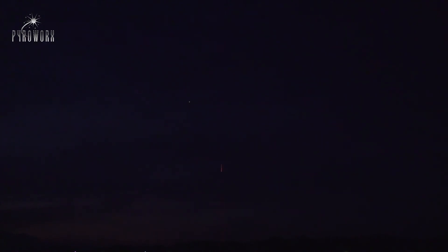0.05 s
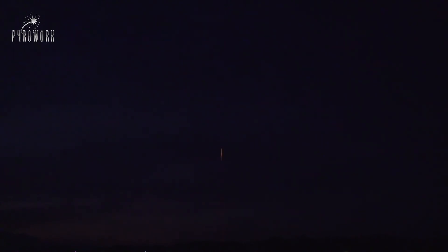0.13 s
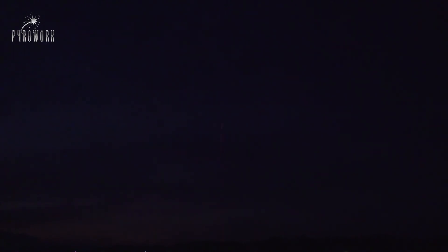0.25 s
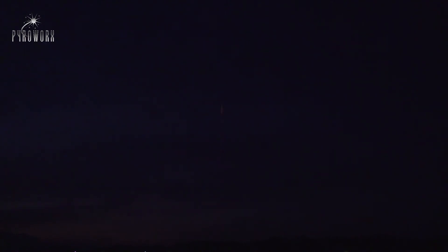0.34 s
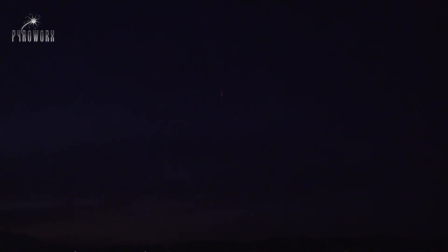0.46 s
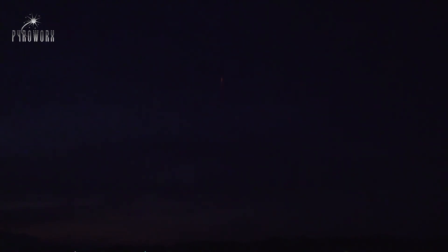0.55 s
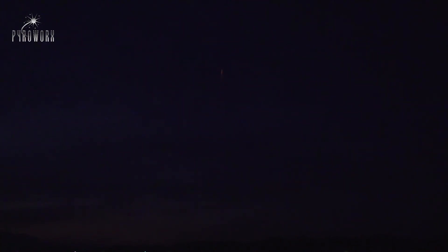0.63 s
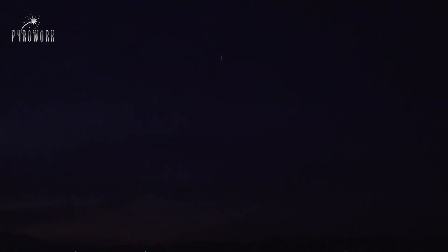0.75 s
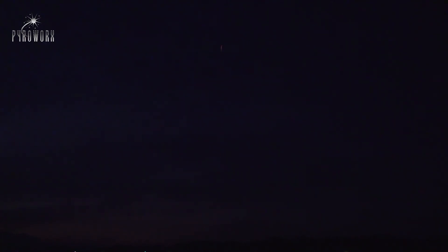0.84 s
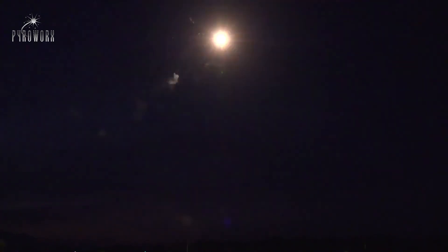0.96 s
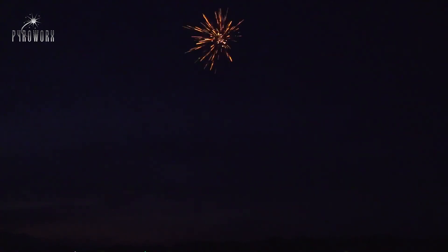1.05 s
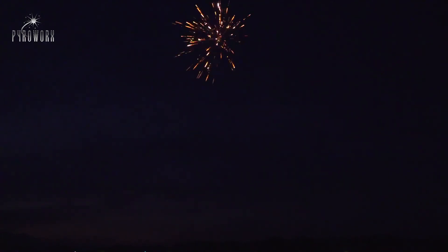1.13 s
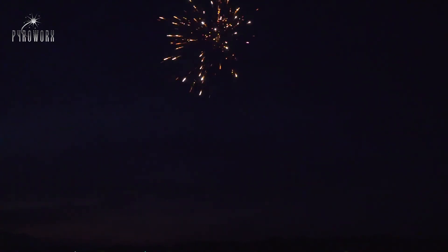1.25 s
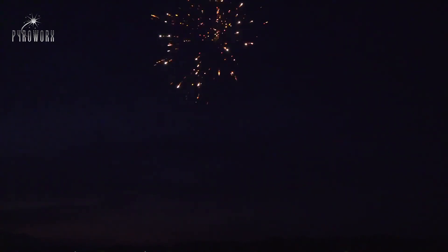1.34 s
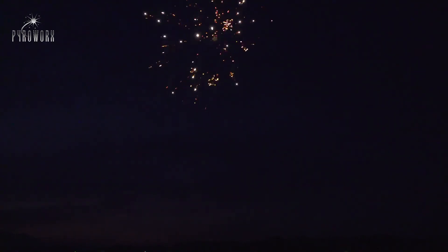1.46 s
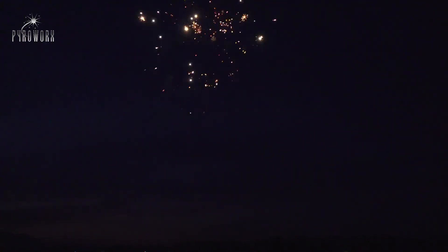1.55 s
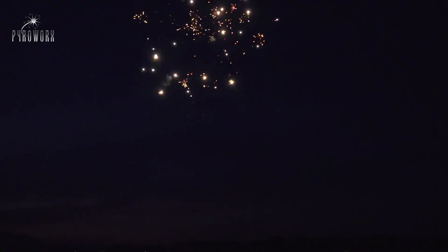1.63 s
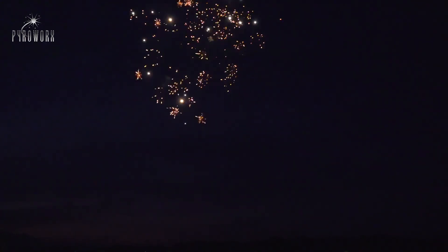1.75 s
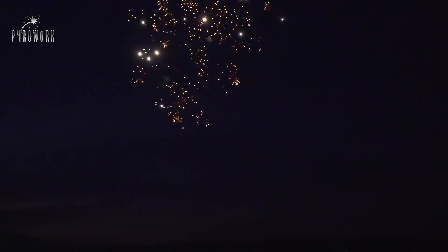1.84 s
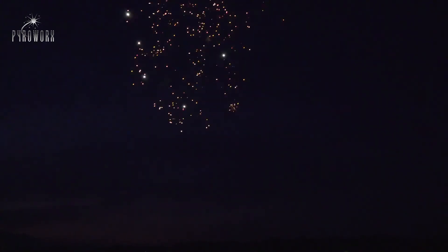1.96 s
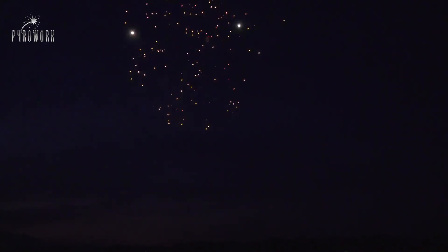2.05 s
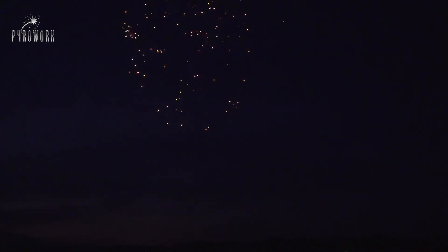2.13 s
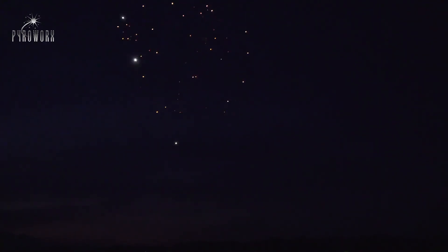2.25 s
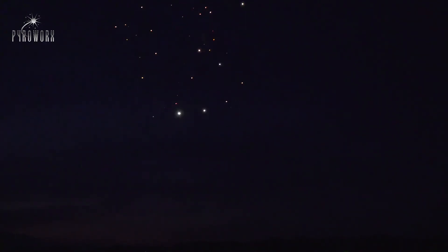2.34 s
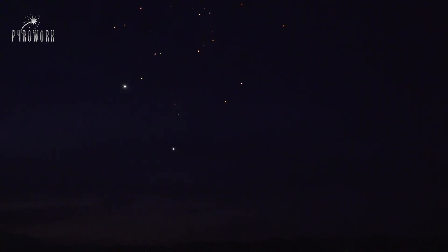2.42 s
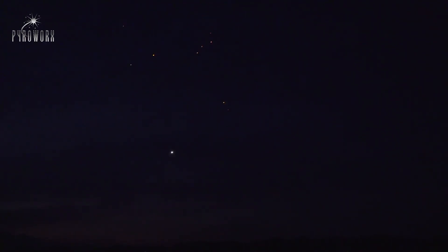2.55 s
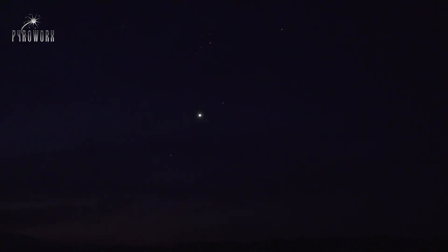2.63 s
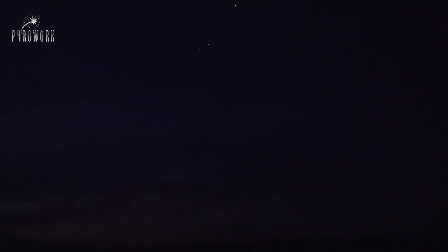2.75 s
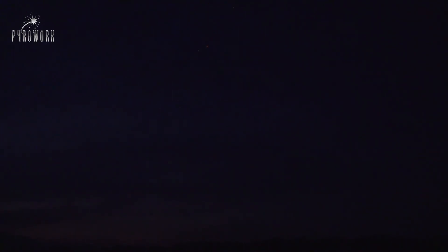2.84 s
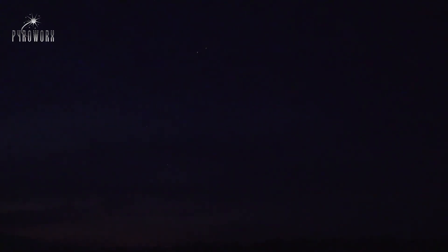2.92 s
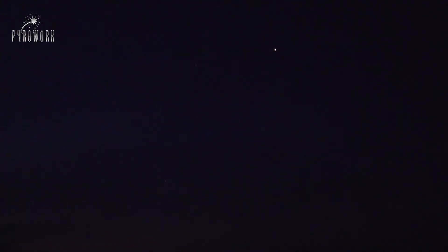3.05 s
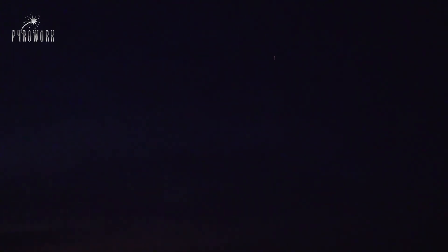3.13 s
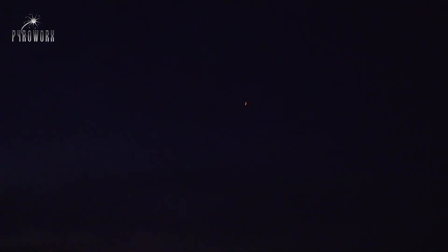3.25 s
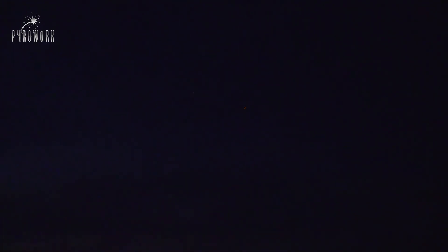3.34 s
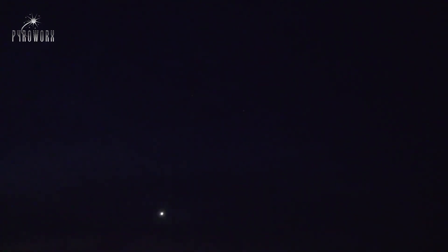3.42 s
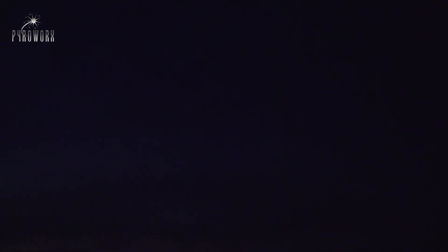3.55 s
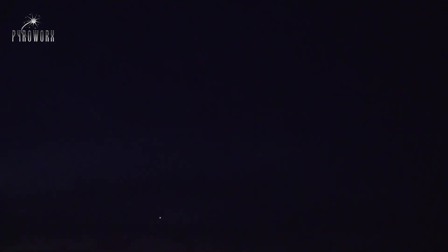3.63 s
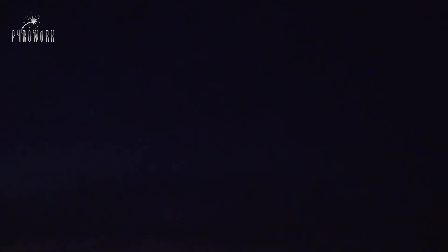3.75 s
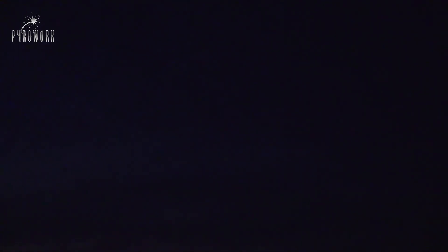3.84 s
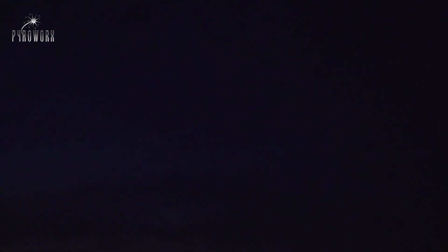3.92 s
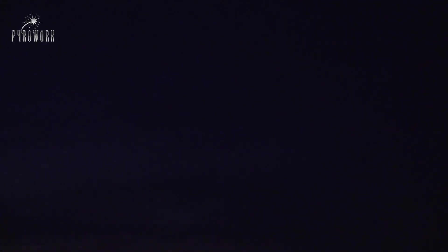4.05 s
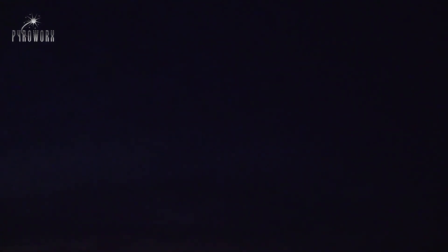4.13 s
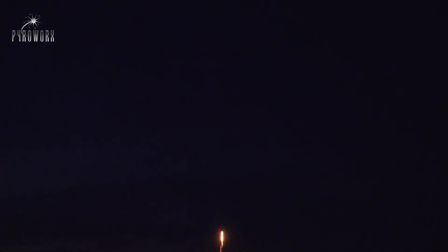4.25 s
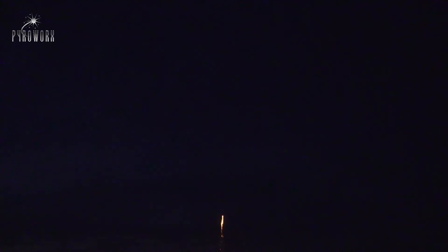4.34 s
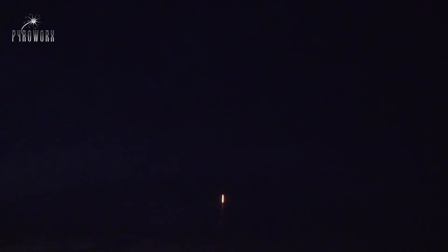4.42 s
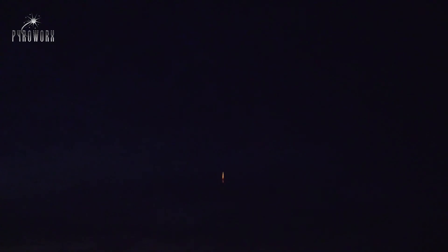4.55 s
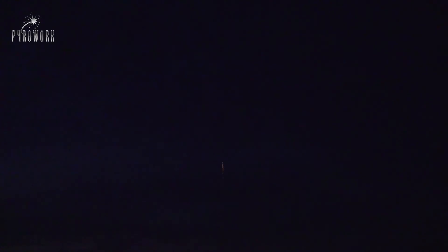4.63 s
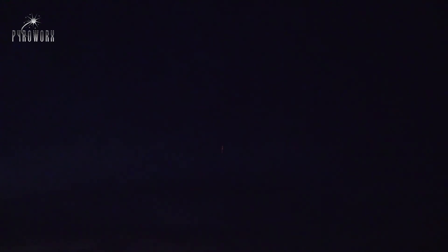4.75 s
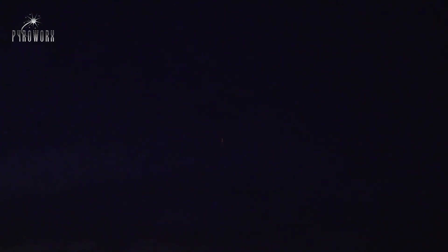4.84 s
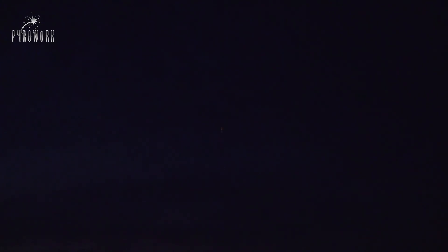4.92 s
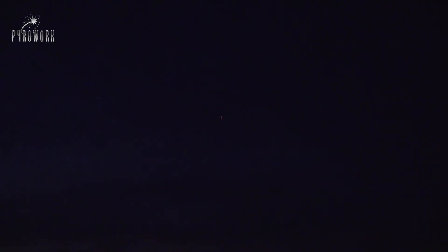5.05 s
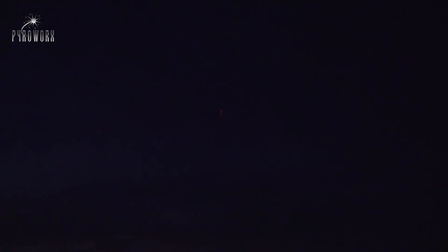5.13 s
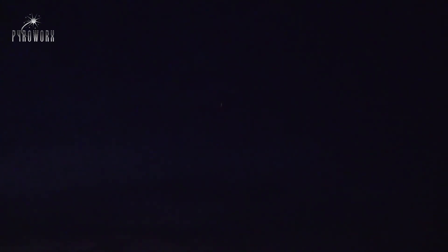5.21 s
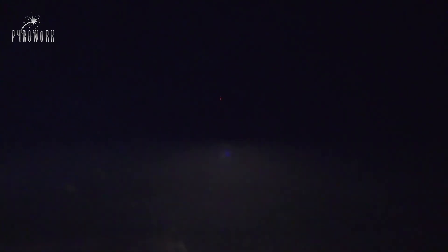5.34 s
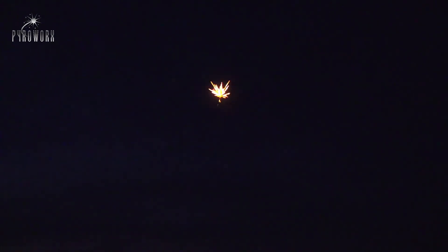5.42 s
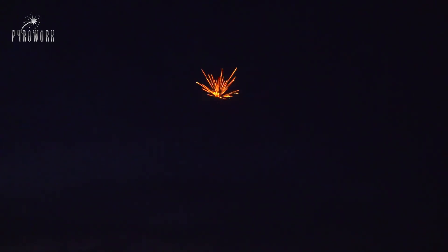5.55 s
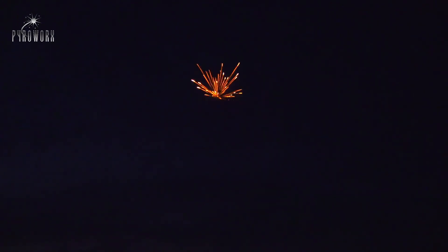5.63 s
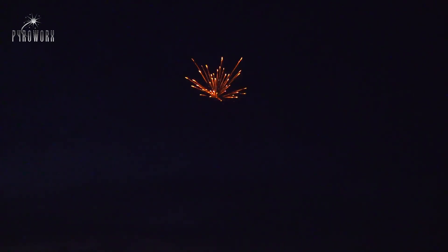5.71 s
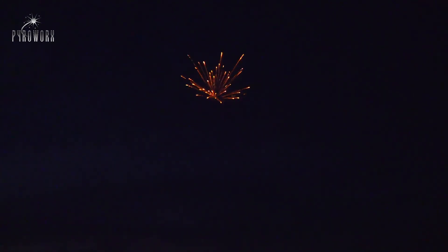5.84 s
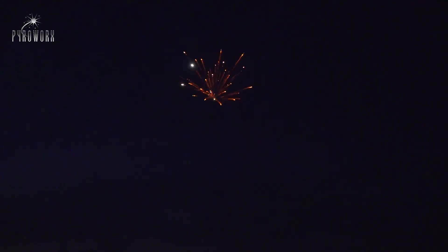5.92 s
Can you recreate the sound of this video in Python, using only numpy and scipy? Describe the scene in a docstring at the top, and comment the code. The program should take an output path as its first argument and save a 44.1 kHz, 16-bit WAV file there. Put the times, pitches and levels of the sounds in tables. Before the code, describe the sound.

Outdoors at night, a firework shot cracks from its tube, bursts overhead into sharp crackling sparks, then a second shot cracks and bangs, echoing far away.

```python
"""Outdoors at night a roman candle is fired: stars leave the tube with a crack and burst overhead as blast waves,
one into crackling sparks. The ground mirrors bursts and sparks; trees and far slopes return diffuse echoes.
A bush cricket chirps in pulses of gliding tone. Far hum, rumble and a breeze brushing the microphone are
shaped noise. The bursts overload the recorder, which is pushed off centre and saturates."""
import sys
import numpy as np
from scipy import signal
from scipy.fft import rfft, irfft, next_fast_len
from scipy.io import wavfile
from scipy.ndimage import uniform_filter1d

SR = 44100
rng = np.random.default_rng(int(sys.argv[2]) if len(sys.argv) > 2 else 0)


def to_wav(s):
    """Save 16-bit WAV."""
    ch = np.atleast_2d(s).T  # columns
    pcm = np.round(np.clip(ch, -1, 1) * 32767)  # PCM
    wavfile.write(sys.argv[1], SR, pcm.astype(np.int16))


N = 263707
LEAD = 2048  # samples computed ahead of time 0 and then cut off
TIME = np.arange(-LEAD, N) / SR

# Spectrum of a spark's snap. Each row: frequency in Hz, relative level in dB.
SNAP_SPECTRUM = [(50, -32), (120, -16.5), (300, -7), (700, -2), (1600, -1), (3200, -2.5), (6000, -8.5),
                 (10000, -19), (15000, -34)]
# Diffuse return of a sound overhead. One row: near ground in dB, its fade in dB per second,
# far country in dB, its fade in dB per second.
OVERHEAD_WASH = (3.5, 1099.5, -22, 4)
# Tree lines and slopes that stand out of it. Each row: delay in seconds, energy per second in dB,
# spread in seconds.
OVERHEAD_ECHOES = [(.108, -12.5, 0.019), (.17, -26, 0.025), (.395, -19.5, 0.032), (.75, -25, 0.12),
                   (1.29, -16, .03), (1.8, -26.5, 0.13)]


def bursts():
    """Superposition of a blast wave, its image in the ground, one hard echo and the rolling tail."""
    # Each row: start in seconds, level in dB before filtering, overpressure length in seconds,
    # ground echo delay in seconds, ground echo share, recorder sag as a factor,
    # echo send in dB against the burst.
    burst_rows = [(1.2954, 21.5, 0.0022, .00598, 0.38, .5, -4.5),
                  (5.6853, 17.5, 0.0019, 0.0056, 0.34, .29, -3)]
    out, sent = np.zeros((2, len(TIME)))
    t = np.arange(SR // 2) / SR
    for s, db, length, delay, ground, sag, send_db in burst_rows:
        # grass softens the front of the mirrored wave
        mirrored = dull(dull(blast_wave(t - delay, 0.52 * length), hz=937), hz=5000)
        wave = dull(blast_wave(t, length), hz=5980) + ground * mirrored
        add(out, s, amp(db) * low_cut(wave, hz=339, q=0.89))

        # the overloaded input is pushed off centre and creeps back with a slow overshoot
        push = np.exp(-t / 0.009)
        overshoot = 0.125 * np.exp(-t / 0.099) * (1 - np.exp(-t / 0.03))
        add(out, s, sag * (overshoot - push))

        hard_echo = scatter(click(SNAP_SPECTRUM), share=1.2, decay=0.0012)
        add(out, s + 0.243, amp(-26) * hard_echo)
        to_landscape = low_cut(blast_wave(t, 0.95 * length), hz=200, q=0.61)
        add(sent, s, amp(db + send_db) * to_landscape)
    return out + landscape(sent, OVERHEAD_WASH, OVERHEAD_ECHOES, lumpy_db=2.0, grain_db=2.5)


def blast_wave(t, length):
    """Blast pulse: a sudden overpressure falls through zero into a longer suction."""
    u = np.maximum(t, 0) / length
    front = np.clip(t / 0.00006, 0, 1)  # the pressure rises within 60 microseconds
    return (1 - u) * np.exp(-u) * front


def launches():
    """Impulsive gas release: a spit, a ragged muzzle crack and a low thump, reflected by hard surfaces."""
    # Shots leaving the tube. Each row: start in seconds, crack level in dB, thump level in dB for its
    # 68 Hz part, echo send in dB before the common 2.5 dB.
    shots = [(-.0035, 7, -27.5, -2.5), (4.3021, 4.5, -30, -1.5)]
    # Spectrum of spit and crack. Each row: frequency in Hz, relative level in dB.
    crack_spectrum = [(100, -15), (300, -11), (1100, -10.5), (1700, -1.5), (2600, -.5), (4000, -7),
                      (6000, -16), (7800, -8.5), (10000, -21), (15000, -31)]
    # Hard surfaces that return the launch. Each row: delay in seconds, crack level in dB,
    # thump in dB against the shot's own before the common -5 dB.
    surfaces = [(0.1881, -16, -37), (0.318, -36.5, -8.5), (.409, -59, -11.5), (0.715, -45.5, -28),
                (.83, -46, -30), (0.846, -43, -27)]
    # Spectrum of the returned crack. Each row: frequency in Hz, relative level in dB.
    slap_spectrum = [(200, -15), (1000, -19), (1500, -8), (2200, 3), (3600, -1), (5500, -7), (9000, -19.5),
                     (15000, -43)]
    # Diffuse return of a shot from the ground. One row: near ground in dB, its fade in dB per second,
    # far country in dB, its fade in dB per second.
    ground_wash = (-9, 347.5, -27.5, 12.5)
    # Echoes that stand out of it. Each row: delay in seconds, energy per second in dB, spread in seconds.
    ground_echoes = [(.21, -21.5, 0.015), (.39, -22, 0.029), (.49, -26, 0.055), (.7, -26, .022),
                     (.865, -19, 0.028), (1.32, -18, 0.02)]

    out, sent = np.zeros((2, len(TIME)))
    t = np.arange(4096) / SR
    crack = click(crack_spectrum, size=len(t))
    thump = np.sin(2 * np.pi * 68 * t) * np.exp(-t / 0.011)
    thump += 2 * np.sin(2 * np.pi * 150 * t) * np.exp(-t / 0.0054)
    far_thump = np.sin(2 * np.pi * 105 * t) * np.exp(-((t - 0.014) / 0.0081) ** 2)
    for s, db, thump_db, send_db in shots:
        offset = abs(TIME - s)  # in seconds, before or after the shot
        spit = np.exp(-offset / 0.0028) * (offset < 0.007)
        out += amp(db - 19.5) * spit * noise(crack_spectrum)
        ragged_crack = scatter(crack, share=0.39, decay=0.0015)
        add(out, s, amp(db) * ragged_crack + amp(thump_db) * thump)
        add(sent, s, amp(db + send_db + 2.5) * crack + amp(thump_db) * thump)
        for delay, crack_db, boom_db in surfaces:
            slap = scatter(click(slap_spectrum), share=0.92, decay=0.002)
            add(out, s + delay, amp(crack_db) * slap)
            add(out, s + delay, amp(thump_db + boom_db - 5.0) * far_thump)
    return out + landscape(sent, ground_wash, ground_echoes, lumpy_db=3.0, grain_db=9.5)


def crackle():
    """Superposed impulses: each spark is a tiny blast of its own sharpness, with a dull ground echo."""
    out = np.zeros(len(TIME))
    snap = click(SNAP_SPECTRUM)
    for s, db in sparks():
        pop = dull(snap, hz=9000 * 2 ** rng.uniform(-0.54, 0.91))
        pop = amp(db) * scatter(pop / pop.max(), share=0.12, decay=0.0011)
        add(out, s, pop)
        add(out, s + rng.uniform(0.0052, 0.0059), amp(-8.0) * dull(pop, hz=1016))
    sent = low_cut(dull(out, hz=3300), hz=259.3, q=0.25)
    return out + amp(3.5) * landscape(sent, OVERHEAD_WASH, OVERHEAD_ECHOES, lumpy_db=3.5, grain_db=6.5)


def sparks():
    """Clustered point process, as rows (s, dB): loud sparks, neighbours they set off, and faint ones."""
    # The loudest sparks. Each row: time in seconds before the shift below, level in dB.
    loud_sparks = [(1.636, -27.5), (1.652, -22.5), (1.694, -23), (1.744, -17.5), (1.75, -19.5),
                   (1.763, -14), (1.827, -16.5), (1.868, -16.5), (1.882, -12.5), (1.902, -11), (1.906, -13),
                   (1.914, -11.5), (1.935, -20), (1.951, -7.5), (1.965, -10.5), (1.972, -12), (1.978, -7),
                   (1.988, -11), (1.995, -10), (2.004, -8.5), (2.01, -8.5), (2.04, -7.5), (2.048, -8),
                   (2.063, -7), (2.075, -4), (2.087, -8.5), (2.092, -9.5), (2.115, -11.5), (2.127, -8),
                   (2.134, -11.5), (2.149, -7.5), (2.16, -10), (2.172, -8), (2.185, -10.5), (2.211, -9.5),
                   (2.232, -9), (2.24, -6), (2.28, -10.5), (2.435, -3)]
    shift_s, spread_s = 0.0014, 0.0004  # fixed shift and small random spread added to each listed time
    thickest_s, thick_width_s = 2.04, 0.093  # the clusters thicken and thin like a bell around this moment
    most_neighbours, cluster_s = 2.6, 0.008  # at the thickest, before rounding; and within what time
    cluster_db, cluster_spread_db = -6.5, 3.5  # level against the loud spark

    # 25 faint sparks: mean time in seconds and level in dB, then their standard deviations
    rows = [rng.normal([2.0, -27], [0.11, 0.5], (25, 2))]
    for s, db in loud_sparks:
        loud = np.array([s + rng.normal(shift_s, spread_s), db])
        lags = cluster_s * rng.random(10)
        levels = rng.normal(cluster_db, cluster_spread_db, 10)
        cluster = loud + np.transpose([lags, levels])
        count = round(most_neighbours * bell(s, thickest_s, thick_width_s))
        rows += [loud, cluster[:count]]
    return np.vstack(rows)


def cricket(pitch_hz=7180, glide_hz=600, rasp_hz=170, length=0.145):
    """Stridulation as AM and FM: wing strokes swell and quicken in a chirp; pitch slides down in each."""
    # Bouts of chirping. Each row: end of the first chirp in seconds, number of chirps,
    # period in seconds before slowing, first level in dB, last level in dB.
    bouts = [(.255, 4, .309, -68, -62.5), (3.065, 11, .2672, -68, -63.5)]
    slowing_s = 0.0024  # each period in a bout is this much longer than the one before
    gate, slide = np.zeros((2, len(TIME)))
    t = np.arange(0, length, 1 / SR)
    strokes = np.cumsum(95 + 55 * t / length) / SR  # strokes so far, at 95 to 150 per second
    chirp = np.sin(np.pi * strokes) ** 4 * np.minimum(0.25 + t / 0.045, 1)
    for first, count, period, first_db, last_db in bouts:
        for k, db in enumerate(np.linspace(first_db, last_db, round(count))):
            start = first - length + k * period + slowing_s * k ** 2 / 2
            add(gate, start, amp(db) * chirp)
            add(slide, start, 1 - 2 * (strokes % 1))
    rasp = evened(uniform_filter1d(rng.standard_normal(len(TIME)), size=15))
    frequency = pitch_hz + glide_hz * slide + rasp_hz * rasp
    return gate * np.sin(2 * np.pi * np.cumsum(frequency) / SR)


def night():
    """Filtered noise under slow envelopes: far countryside hum, distant rumble, gusts on the microphone."""
    # Spectra of hum, rumble and breeze. Each row: frequency in Hz, relative level in dB.
    hum_spectrum = [(20, -19.5), (40, -11.5), (80, -9.5), (122, -1), (160, -7.5), (350, -1), (680, -8.5),
                    (1050, -8), (2600, -17), (5500, -28.5), (8000, -28.5), (9500, -35), (14000, -39),
                    (16000, -65.5)]
    rumble_spectrum = [(40, -21.5), (150, -9.5), (350, 3), (550, -5), (1100, -12), (2500, -31), (8000, -55)]
    breeze_spectrum = [(15, 1), (40, 3), (90, -2.5), (200, -9.5), (400, -29), (1500, -69.5)]
    # Slow swell of the hum. Each row: time in seconds, level in dB against the hum's base level.
    hum_swell = [(0, 0.5), (1.2, 0), (1.5, 5.5), (3.9, -6), (4.5, 1.5), (5.0, -1.5), (5.65, -1)]
    # Swells of the rumble. Each row: peak time in seconds, peak level in dB.
    rumble_swells = [(.03, -50.5), (4.24, -52)]
    # Gusts. Each row: peak time in seconds, peak level in dB, rise in seconds, fade in dB per second.
    gusts = [(.645, -45, .035, 62), (1.15, -50.5, 0.042, 25)]

    hum_db = -57 + np.interp(TIME, *np.transpose(hum_swell))
    hum = noise(hum_spectrum) * amp(hum_db)
    rumble_level = sum(amp(db) * bell(TIME, s, width=0.066) for s, db in rumble_swells)
    rumble = noise(rumble_spectrum) * rumble_level
    breeze = noise(breeze_spectrum) * sum(gust(*row) for row in gusts)
    return hum + rumble + breeze


def gust(peak_s, db, rise, fade):
    """Envelope of wind turbulence: it rises quickly, slackens exponentially, then drops away."""
    hold_s, drop_db_per_s = 0.2, 220  # after this long the extra drop sets in
    age = TIME - peak_s
    slack_db = fade * np.maximum(age, 0) + drop_db_per_s * np.maximum(age - hold_s, 0)
    return np.clip(1 + age / rise, 0, 1) * amp(db - slack_db)


def landscape(x, wash, echoes, lumpy_db, grain_db):
    """Diffuse reflection: countless echoes, a few standing out; air absorbs more treble from later ones."""
    # Spectrum of the return. Each row: frequency in Hz, relative level in dB.
    return_spectrum = [(60, -3), (130, -4), (350, -1), (700, -7), (1200, -3.5), (4000, 3), (14000, 2.5)]
    # Absorption by air. Each row: frequency in Hz, loss in dB per second of travel.
    air_loss = [(60, 6.5), (500, 0.5), (1200, 0.5), (3000, 9), (7000, 14), (14000, 32)]
    t = np.arange(3 * SR) / SR
    near_db, near_fade, far_db, far_fade = wash
    power = amp(near_db - near_fade * t) ** 2 + amp(far_db - far_fade * t) ** 2
    power = power + sum(amp(db) ** 2 * bell(t, delay, spread) for delay, db, spread in echoes)

    lumps = evened(uniform_filter1d(rng.standard_normal(len(t)), size=400))
    sizes = evened(amp(grain_db * np.minimum(rng.standard_normal(len(t)), 3)))
    signs = rng.choice([-1, 1], len(t))
    taps = sizes * signs * np.sqrt(power / SR) * amp(lumpy_db * lumps)

    hz, delay, z = signal.stft(taps, SR, nperseg=256)
    colour_db = read(return_spectrum, hz)[:, None] - read(air_loss, hz)[:, None] * delay
    tail = signal.istft(z * amp(colour_db), SR, nperseg=256)[1]
    return signal.fftconvolve(x, tail)[:len(x)]


def scatter(pulse, share, decay):
    """Multiple scattering: a short decaying spray of random copies follows a pulse."""
    t = np.arange(len(pulse)) / SR
    spray = rng.standard_normal(len(t)) * np.exp(-t / decay) * (1 - np.exp(-t / 0.00023))
    spray /= np.linalg.norm(spray)
    return pulse + share * signal.fftconvolve(pulse, spray)[:len(t)]


def low_cut(x, hz, q):
    """Second-order high-pass, the microphone's bass roll-off: it makes a blast wave swing."""
    w = 2 * np.pi * hz
    return signal.lfilter(*signal.bilinear([1, 0, 0], [1, w / q, w * w], SR), x)


def dull(x, hz):
    """First-order low-pass: treble falls gently above the corner frequency."""
    return signal.lfilter(*signal.butter(1, min(hz, SR / 3), fs=SR), x)


def click(spectrum, size=2048):
    """Minimum-phase impulse: a causal click of a given spectrum, with peak 1."""
    log_gain = np.log(amp(read(spectrum, abs(np.fft.fftfreq(size, 1 / SR)))))
    pulse = np.fft.ifft(np.exp(np.conj(signal.hilbert(log_gain)))).real
    return pulse / abs(pulse).max()


def noise(spectrum):
    """Spectral shaping: steady noise of a given spectrum, with rms 1."""
    size = next_fast_len(len(TIME), True)
    z = rfft(rng.standard_normal(size))
    z = z * amp(read(spectrum, np.fft.rfftfreq(size, 1 / SR)))
    return evened(irfft(z, size)[:len(TIME)])


def bell(t, centre, width):
    """Gaussian envelope: a smooth swell of height 1."""
    return np.exp(-0.5 * ((t - centre) / width) ** 2)


def read(points, hz):
    """Interpolation of a spectrum on a log-frequency axis."""
    f, value = np.transpose(points)
    return np.interp(np.log(hz + 1), np.log(f + 1), value)


def evened(x):
    """Normalisation to rms 1."""
    return x / np.sqrt(np.mean(x ** 2) + 1e-20)


def amp(db):
    """Amplitude gain of a level in decibels."""
    return 10 ** (np.asarray(db) / 20)


def add(mix, s, sound):
    """Linear superposition of a sound from time s in seconds."""
    part = mix[max(round(s * SR) + LEAD, 0):][:len(sound)]
    part += sound[:len(part)]


def scene():
    """Superposition: the pressures of all sources add, alike in both channels."""
    mix = bursts() + launches() + crackle() + cricket() + night()
    mix = mix[LEAD:]
    return np.array([mix, mix])


def record(dry):
    """Saturation and band limiting: the recorder flattens peaks near full scale, then cuts the top."""
    clipped = dry / (1 + dry ** 6) ** (1 / 6)
    low_pass = signal.firwin(255, 16100, window=("kaiser", 8), fs=SR)  # edge in Hz
    return signal.oaconvolve(clipped, low_pass[None], "same")


dry = scene()
out = record(dry)
to_wav(out)
```